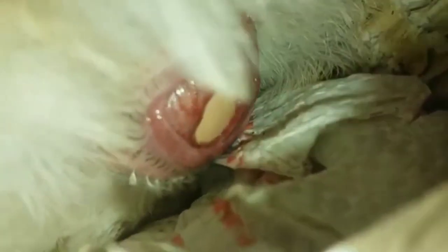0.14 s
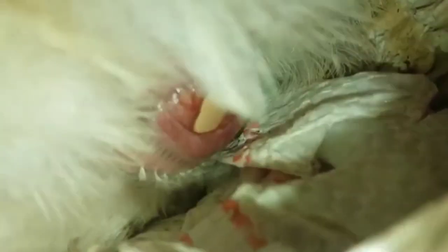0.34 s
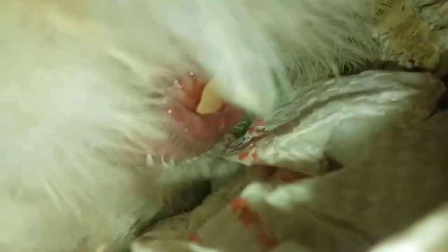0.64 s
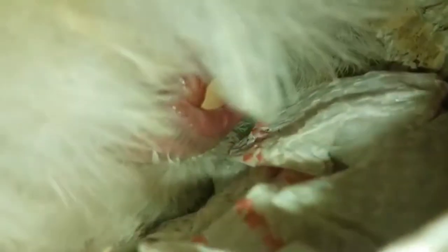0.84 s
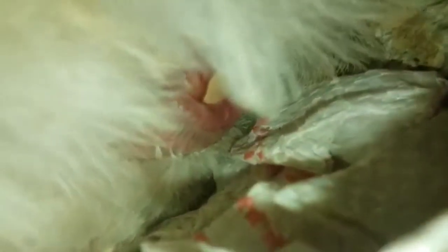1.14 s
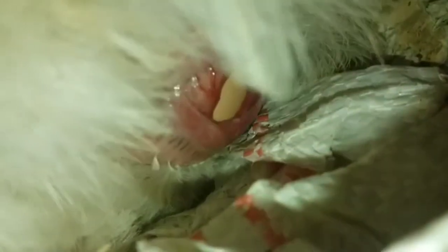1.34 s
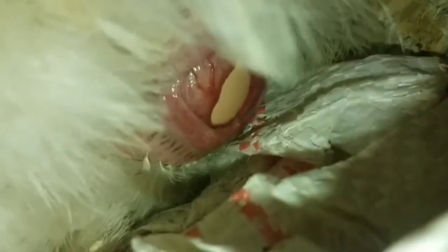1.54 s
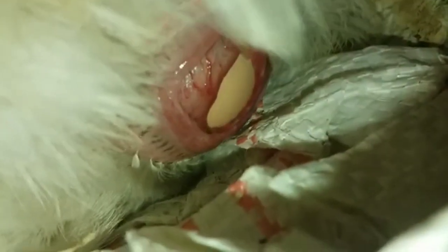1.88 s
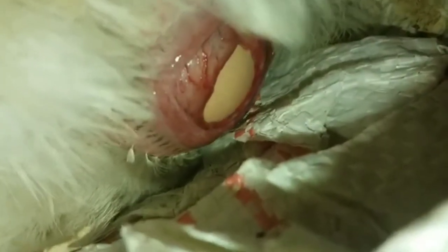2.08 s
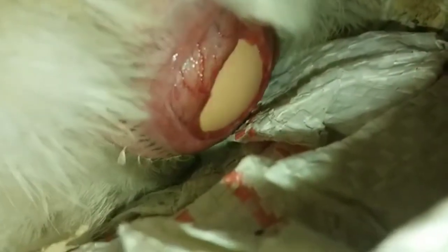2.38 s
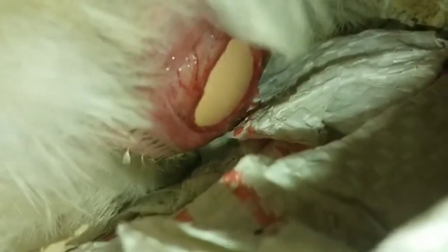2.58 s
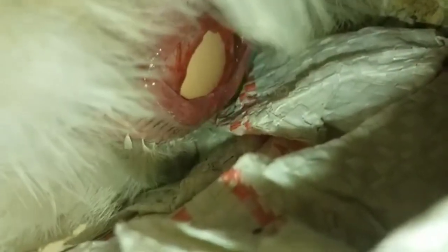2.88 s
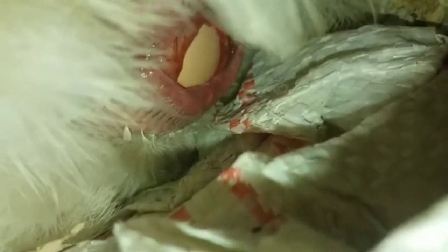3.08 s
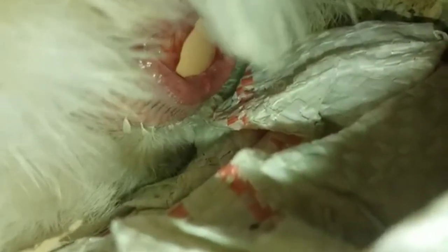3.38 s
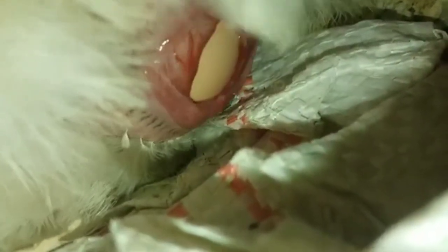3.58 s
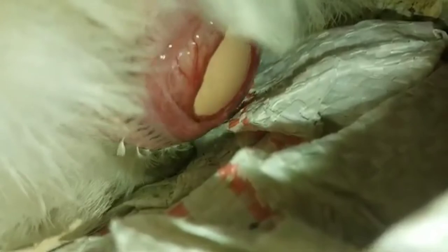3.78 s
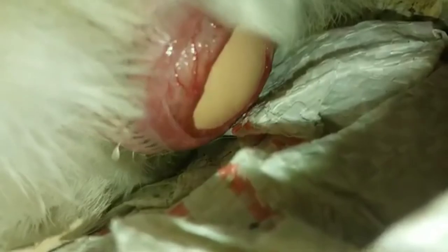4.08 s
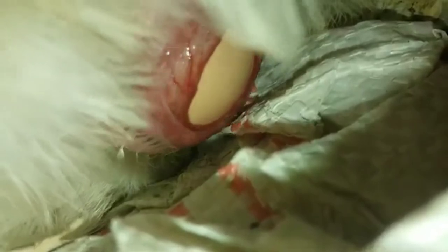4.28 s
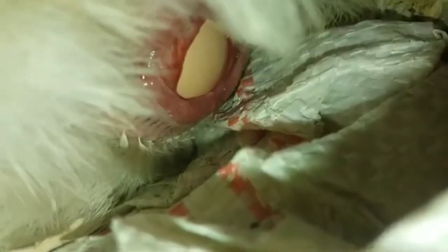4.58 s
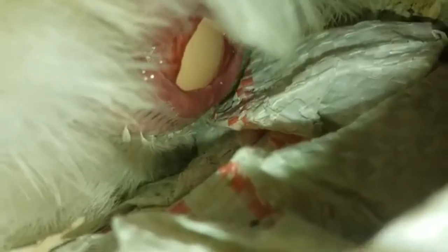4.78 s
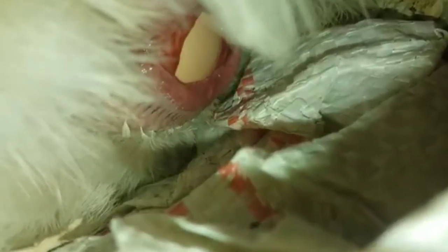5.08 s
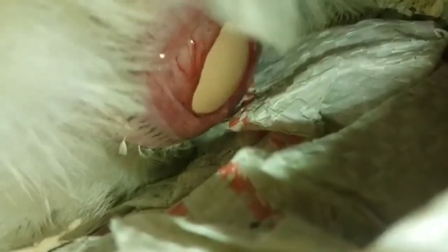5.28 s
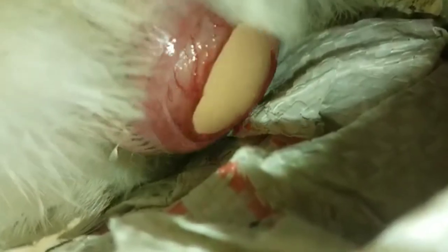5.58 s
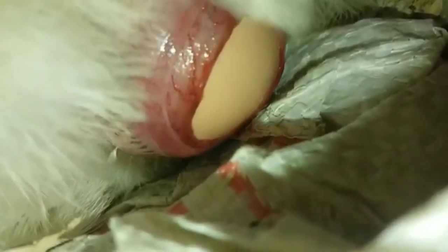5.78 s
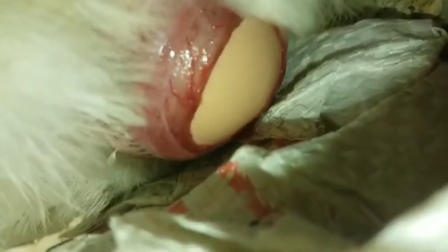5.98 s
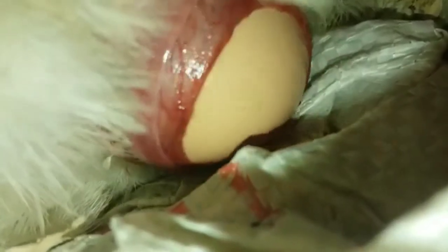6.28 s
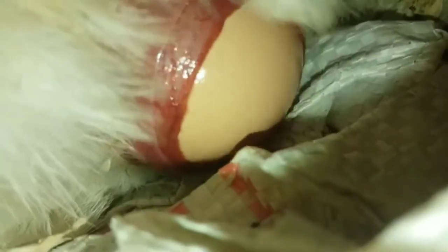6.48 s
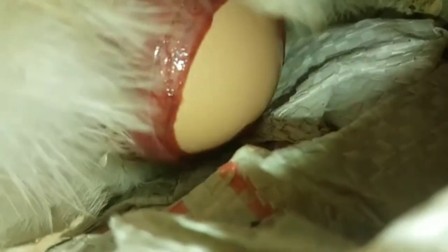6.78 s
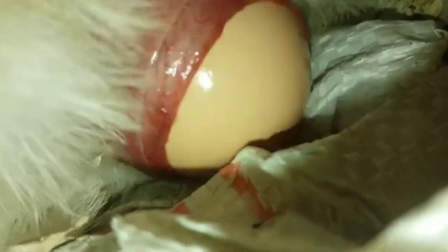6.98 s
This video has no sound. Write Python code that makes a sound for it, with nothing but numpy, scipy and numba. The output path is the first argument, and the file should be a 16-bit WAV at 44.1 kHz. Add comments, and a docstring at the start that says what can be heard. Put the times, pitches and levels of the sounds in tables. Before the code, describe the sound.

A hen is heard very close in a small boarded coop, with brief woody echoes and a faint steady rumble and hiss. From the start she gives short, hoarse, rather quiet clucks four to five times a second, while soft low thuds, dry ticks, rustling sacking and crackles bump the microphone, densest up to about 1.5 seconds. At 1.07 a loud raspy squawk of a quarter second bends upward, followed by a strong cluck at 1.4. The bumps become lighter and mostly stop after 3, leaving regular gravelly clucks. At 4.9 a second, rougher squawk bursts out, sagging at its end. Louder clucks at 5.3 and 5.55 each run into a thin, short whine. At 5.77 a long, high, wavering moan begins fairly clear, splits around 6.15 into a buzzing two-voiced rasp with faint whistling overtones, and slowly weakens until the end near 7.1.

```python
"""A hen lays an egg in a small coop, the microphone close by in the nest. She clucks hoarsely four to five times
a second and squawks twice, by uneven pulses of her syrinx through throat resonances; two thin whines among the last
clucks lead to a long moan, whose harmonics split into the sum and difference tones of a two-voiced rasp.
Soft thuds, ticks, rustle and crackles of the nest's sacking sound right at the microphone, mostly early on.
The boards of the coop echo the voice briefly, over a faint steady rumble and hiss."""
import sys
import numpy as np
from scipy import signal
from scipy.fft import rfft, irfft
from scipy.io import wavfile
from scipy.ndimage import uniform_filter1d
from numba import njit

SR = 44100
rng = np.random.default_rng(int(sys.argv[2]) if len(sys.argv) > 2 else 0)


def log_audio(samples):
    """Write samples as a 16-bit WAV file to the path given in sys.argv[1]."""
    # one column per channel
    frames = np.atleast_2d(samples).T
    # limit to full scale, then quantise
    limited = np.clip(frames, -1, 1)
    pcm = np.round(limited * 32767).astype(np.int16)
    wavfile.write(sys.argv[1], SR, pcm)


N = 314874
T = np.arange(N) / SR  # s

# pitch line of the long moan, which wavers, then tightens slowly: time_s, pitch_hz
MOAN_PITCH = [(5.765, 710.8), (5.815, 757.5), (5.86, 721), (5.92, 748.2), (5.96, 718), (6.06, 765),
              (6.2, 761.8), (6.7, 763.6), (7.14, 778.4)]
MOAN_START_S, MOAN_ATTACK_S = MOAN_PITCH[0][0], 0.025
SPLIT_AT_S = 6.15  # the second side of the syrinx is half joined in

# bumps at the microphone, before their common colouring: time_s, thud_level_db, thud_pitch_hz, tick_level_db
NEST_BUMPS = [(0.146, -7.5, 175, -46), (.301, -12.5, 243, -52), (.337, -12, 210, -40), (.487, -6, 292, -35),
              (0.501, -7.5, 200, -41), (.614, -26.5, 178, -55), (.74, -9.5, 212, -26),
              (.771, -1.5, 255, -22), (0.982, -9.5, 187, -27), (1.083, -17.5, 221, -29),
              (1.193, 0, 239, -23), (1.217, -11.5, 220, -23), (1.286, -3, 227, -22.5),
              (1.343, -11.5, 165, -29), (1.529, -8, 468, -25.5), (1.569, -18.5, 490, -32.5),
              (1.807, -12, 496, -33.5), (1.93, -34, 668, -32), (1.985, -16.5, 540, -33.5),
              (2.04, -14, 366, -23.5), (2.083, -21, 260, -31), (2.204, -19.5, 493, -48),
              (2.286, -25.5, 618, -27.5), (2.299, -24, 398, -37), (2.449, -27.5, 650, -46),
              (2.614, -19, 657, -59), (2.682, -36, 694, -29.5), (2.73, -25.5, 531, -58),
              (2.899, -29, 535, -51), (2.947, -31, 620, -57), (3.189, -52, 500, -39),
              (4.034, -36.5, 294, -40), (5.691, -24.5, 740, -60)]


def undb(db):
    """Decibels to gain."""
    return 10 ** (np.asarray(db) / 20)


def unit(x):
    """Scale to rms 1."""
    return x / np.sqrt(np.mean(x ** 2) + 1e-18)


def steady(x, size=900):
    """Scale so that the running rms over `size` samples is about 1."""
    return x / np.sqrt(np.abs(uniform_filter1d(x ** 2, size)) + 1e-12)


def curves(rows, t):
    """The columns of a table, joined by straight lines along the first."""
    s, *columns = np.transpose(rows)
    return [np.interp(t, s, c) for c in columns]


def colour(x, points, size=8192):
    """Causal minimum-phase filter through (Hz, dB) points."""
    hz, db = np.transpose(points)
    bins = np.maximum(np.fft.rfftfreq(size, 1 / SR), 1)
    cepstrum = irfft(np.log(undb(np.interp(np.log(bins), np.log(hz), db))))
    # folding the cepstrum forward in time makes the response causal
    cepstrum[1:size // 2] *= 2
    cepstrum[size // 2 + 1:] = 0
    response = irfft(np.exp(rfft(cepstrum)))
    return signal.fftconvolve(x, response)[:len(x)]


def resonance(x, hz, width_hz):
    """Two-pole band-pass, gain 1 at the centre."""
    return signal.lfilter(*signal.iirpeak(hz, hz / width_hz, fs=SR), x)


@njit
def moving_resonance(x, hz, width_hz):
    """State-variable band-pass whose centre moves, gain 1 at the centre."""
    y, band, low = np.empty(len(x)), 0., 0.
    for i in range(len(x)):
        g, k = np.tan(np.pi * hz[i] / SR), width_hz / hz[i]
        v = (band + g * (x[i] - low)) / (1 + g * (g + k))
        band, low, y[i] = 2 * v - band, low + 2 * g * v, k * v
    return y


def wander(t, rate):
    """Random values, `rate` a second, joined by lines."""
    values = rng.standard_normal(8192)
    place = (t - t[0]) * rate
    return 1.2 * np.interp(place, np.arange(len(values)), values)


def envelope(t, start, length, attack_s, release_s):
    """Rise, hold and fall, 0-1."""
    rise, fall = (t - start) / attack_s, (start + length - t) / release_s
    return np.clip(np.minimum(rise, fall), 0, 1)


def syrinx(t, hz, rough, jitter, shimmer, doubling, air_db, count=16):
    """Membrane pulses of uneven period and size, alternately strong and weak, with a puff of air in each cycle."""
    phase = 2 * np.pi * np.cumsum(hz * (1 + jitter * rough * wander(t, 450))) / SR
    # the windpipe delays each harmonic differently, which spreads a pulse over its cycle
    pulses = unit(sum(np.cos(k * phase + k * k / 2) for k in range(1, count + 1)))
    strength = 1 + rough * (shimmer * wander(t, 500) + doubling * np.cos(phase / 2))
    air = rng.standard_normal(len(t)) * (1 + .5 * np.cos(phase))
    return pulses * strength + undb(air_db) * rough * air


def clucks():
    """Each cluck is one short push: the voice snaps on low, rises, swells and droops; treble opens at its height."""
    # single clucks: centre_s, length_s, pitch_hz at the centre, level_db
    cluck_rows = [(0.173, 0.075, 345.6, -36.5), (.368, 0.053, 339, -32), (0.566, 0.052, 360.7, -32.5),
                  (0.787, 0.067, 365, -30.5), (1.007, 0.066, 342.5, -33.5), (1.413, 0.062, 337.4, -21),
                  (1.618, .059, 368, -25.5), (1.839, 0.075, 373.8, -28), (2.362, 0.069, 366, -30),
                  (2.586, 0.071, 373.2, -29), (2.813, .066, 402.6, -29), (3.021, 0.062, 386.8, -28),
                  (3.234, .067, 352.2, -30.5), (3.45, .075, 387.5, -31), (3.677, .065, 406, -28),
                  (3.912, .065, 400.2, -28), (4.153, 0.073, 368, -30.5), (4.401, 0.07, 364.3, -28.5),
                  (4.615, .055, 374.7, -27.5), (4.841, 0.072, 348, -27.5), (5.32, 0.075, 467, -23.5),
                  (5.564, .075, 396.4, -25)]
    # throat of the clucking hen: frequency_hz, level_db
    throat = [(120, -37), (205, -10), (290, -13.5), (390, -9.5), (560, -10), (780, -4), (1030, -1.5),
              (1220, -0.5), (1380, -9.5), (1580, -26), (1830, -19), (2500, -36), (2900, -35), (3500, -42),
              (6000, -66), (8000, -89.5)]
    # a tighter voice is cleaner: pitch_hz, roughness (0-1)
    roughness = [(370, 0.93), (467, 0.63)]
    # bass of the clucks, thinner in the later ones: time_s, level_db
    bass = [(2.4, -0.5), (3.4, 2), (4.4, -2), (5.3, -10)]
    climb, arch = 0.1605, .75  # shares of the pitch: climb over a cluck, and how far its ends hang down
    out = np.zeros(N)
    for centre, length, hz, db in cluck_rows:
        rough, = curves(roughness, hz)
        span = np.abs(T - centre) < .7 * length
        t = T[span]
        u = (t - centre) / length  # place in the cluck, in lengths from its centre
        push = np.exp(-np.abs(u / 0.35) ** 2.2)
        onset = np.clip((u + .52) * length / .003, 0, 1)
        pitch = hz * (1 + climb * u - arch * u ** 2 + .025 * wander(t, 50))
        source = syrinx(t, pitch, rough, jitter=.04, shimmer=.5, doubling=.9, air_db=-5)
        bass_db, = curves(bass, centre)
        voice = colour(colour(source, throat), [(210, bass_db), (350, bass_db / 2), (650, 0.0048)])
        # the throat resonance sweeps up to the third harmonic as the beak opens, and back down
        throat_hz = 3 * hz * np.maximum(1 - 1.8 * (u - .1) ** 2, .5)
        voice = voice + 0.77 * moving_resonance(voice, throat_hz, 200.0)
        closed = colour(voice, [(1300, -3), (2200, -15.0), (5000, -14.5)])
        opening = push * voice + (1 - push) * closed
        out[span] += undb(db) * onset * push * steady(opening, size=400)
    return out


def squawks():
    """Loud held cries that bend in, break up at both ends, sag as the push ends and turn brighter where rough."""
    # single squawks: start_s, length_s, pitch_hz at mid-length, glide_hz_per_s,
    # scoop (opening dip as a share of the pitch, negative is upward), level_db at mid-length, swell_db_per_s,
    # roughness (0-1) while held, beak_hz at the start, sink_s (time the beak resonance takes to sink)
    squawk_rows = [(1.065, .232, 550.1, 151.5, .18, -17, 9, 0.21, 3010, .04),
                   (4.912, 0.28, 559, -39.5, -.08, -18.5, 1.5, .5, 2620, 0.078)]
    # throat of the squawking hen: frequency_hz, level_db
    throat = [(200, -50.5), (400, -18), (530, -10.5), (770, -6), (1130, -3.5), (1400, -8.5), (1750, -20.5),
              (2250, -19), (2600, -30), (3000, -38.5), (3450, -30.5), (4100, -46.5), (4500, -43),
              (5100, -54), (6000, -50.5), (7500, -89)]
    scoop_at_s, scoop_width_s = .024, .012  # when the opening scoop is deepest
    sag = 0.24  # share of the pitch lost as the push ends
    break_s, break_rough = .035, .85  # length and roughness of the broken ends
    low_beak_hz, upper_ratio = 2218, 1.47  # where the beak resonance sinks to; a weaker one moves above it
    beak_flare = 1.5  # extra ring of the beak while it is wide open
    out = np.zeros(N)
    for start, length, hz, glide, scoop, db, swell, held_rough, open_hz, sink_s in squawk_rows:
        span = (T > start) & (T < start + length)
        t = T[span]
        age, left = t - start, start + length - t
        dip = scoop * np.exp(-((age - scoop_at_s) / scoop_width_s) ** 2)
        dip = dip + sag * np.exp(-(left / break_s) ** 2)
        pitch = (hz + glide * (age - length / 2)) * (1 - dip)
        broken = np.exp(-(np.minimum(age, left) / break_s) ** 4)
        rough = held_rough + (break_rough - held_rough) * broken
        gape = np.exp(-(age / sink_s) ** 2)
        beak_hz = low_beak_hz + (open_hz - low_beak_hz) * gape
        source = syrinx(t, pitch, rough, jitter=.05, shimmer=.7, doubling=.6, air_db=5)
        # turbulent air buries the upper harmonics in rasp
        source = source + 1.3 * resonance(rng.standard_normal(len(t)), 4000, 2600)
        voice = colour(source, throat)
        beak = moving_resonance(moving_resonance(voice, beak_hz, 430.0), beak_hz, 430.0)
        upper_hz = upper_ratio * beak_hz
        upper = moving_resonance(moving_resonance(voice, upper_hz, 350.0), upper_hz, 350.0)
        ring = rough * (1 + beak_flare * gape) * (2.1 * beak + 1.3 * upper)
        voice = voice + 0.87 * resonance(voice, 1120, 140) + ring
        gain = undb(db + swell * (age - length / 2) - 1.5 * broken)
        gain = gain * envelope(t, start, length, attack_s=0.02, release_s=0.06)
        out[span] += gain * steady(voice)
    return out


def two_voices(t, hz, share):
    """A thin held note; as the second side of the syrinx joins in, sum and difference tones turn it into a rasp."""
    # harmonics of the thin note: multiple, level_db
    harmonics = [(1, -3.5), (2, 3.5), (3, -32.5), (4, -36)]
    # faint top harmonics that come and go: multiple, level_db
    sheen = [(5, -50.5), (7, -51), (8, -52)]
    # tones of the two coupled voices: multiple of the first, multiple of the second, level_db
    combinations = [(0, 1, -0.5), (1, 1, 0.5), (1, 2, -13.5), (0, 2, -11.5), (2, -1, -13.5)]
    # throat that colours the rasping air: frequency_hz, level_db
    throat = [(180, -59.5), (420, -25.5), (570, -7.5), (680, -8), (800, -11.5), (1180, -10), (1340, -4),
              (1520, -13), (1680, -22.5), (1880, -13), (2100, -32.5), (2720, -35.5), (2950, -49.5),
              (7000, -75)]
    second_hz = 571
    # the second voice keeps catching and letting go
    share = np.clip(share + .1 * wander(t, 22), 0, 1)
    rough = 0.15 + .7 * share  # the first voice by itself is slightly rough
    first = 2 * np.pi * np.cumsum(hz * (1 + 0.0487 * rough * wander(t, 350))) / SR
    second = 2 * np.pi * np.cumsum(second_hz * (1 + .017 * wander(t, 300))) / SR
    clear = sum(undb(d) * np.sin(round(k) * first) for k, d in harmonics)
    clear = clear + sum(undb(d) * wander(t, 65) * np.sin(round(k) * first) for k, d in sheen)
    # each combination tone flares and fades by itself
    split = sum(undb(d + 3.8 * wander(t, 44.86)) * np.sin(round(k) * first + round(m) * second)
                for k, m, d in combinations)
    # air escapes in puffs at the beat between the two sides
    puffs = rng.standard_normal(len(t)) * (1 + np.cos(first - second))
    rasp = unit(colour(puffs, throat))
    voice = (1 - 0.74 * share) * clear + share * split
    voice = voice * (1 + 0.35 * rough * wander(t, 400))
    return steady(steady(voice, size=4000) + rough * rasp, size=1800)


def moan():
    """One long note that starts fairly clear, splits into two voices and fades slowly."""
    level_db, fade_db_per_s = -27.5, 5
    share_before, share_after = 0.25, 0.854  # mean share of the second voice, 0-1
    span = T > MOAN_START_S
    t = T[span]
    age = t - MOAN_START_S
    hz, = curves(MOAN_PITCH, t)
    split = (1 + np.tanh((t - SPLIT_AT_S) / 0.037)) / 2
    gain = undb(level_db - fade_db_per_s * age) * np.minimum(age / MOAN_ATTACK_S, 1)
    out = np.zeros(N)
    out[span] = gain * two_voices(t, hz, share_before + (share_after - share_before) * split)
    return out


def overtone():
    """Thin, slightly grainy whistles ride on the moan, flare where the voice splits and sink in pitch."""
    # whistles above the moan: pitch_hz before sinking, level_db before the flare, fade_db_per_s after the split
    whistles = [(2850, -60, 0), (4780, -77.5, 17.5)]
    sink_hz, sink_s = 160, .22
    flare_db, flare_s = 10.5, 0.07
    since = T - SPLIT_AT_S
    # the pitch begins to sink as the flare builds up
    sunk_hz = sink_hz * (1 - np.exp(-np.maximum(since + flare_s, 0) / sink_s))
    attack = np.clip((T - MOAN_START_S) / MOAN_ATTACK_S, 0, 1)
    gain = undb(flare_db * np.exp(-(since / flare_s) ** 2)) * attack
    out = np.zeros(N)
    for hz, db, fade in whistles:
        phase = 2 * np.pi * np.cumsum((hz - sunk_hz) * (1 + .01 * wander(T, 400))) / SR
        grain = 1 + 0.5 * wander(T, 90)
        out += undb(db - fade * np.maximum(since, 0)) * np.sin(phase) * grain
    return gain * out


def whines():
    """Short notes: the pitch arches over a clear crest, the voice frays off it and the level fades."""
    # single whines: start_s, length_s, crest_s, crest_pitch_hz, arch_width_s, level_db at the crest,
    # fade_db_per_s, share of the second voice at the crest (0-1)
    whine_rows = [(5.282, 0.21, 5.365, 721, .095, -32.5, 40.5, 0.25),
                  (5.572, 0.17, 5.622, 766.7, .04, -26.5, 69.5, 0)]
    arch = 0.11  # share by which the pitch lies lower off the crest
    fray = .3  # how much the share of the second voice grows off the crest
    out = np.zeros(N)
    for start, length, crest, hz, width, db, fade, share in whine_rows:
        span = (T > start) & (T < start + length)
        t = T[span]
        slack = 1 - np.exp(-((t - crest) / width) ** 2)
        gain = undb(db - fade * (t - crest)) * envelope(t, start, length, attack_s=0.014, release_s=0.032)
        out[span] += gain * two_voices(t, hz * (1 - arch * slack), share + fray * slack)
    return out


def coop(x, early_db, early_s, tail_db, t60, size=26000):
    """Near boards scatter the first echoes; a short tail follows."""
    # what the boards give back: frequency_hz, level_db
    boards = [(100, -7.5), (400, -2), (800, -2.5), (1130, -2), (1600, -1.5), (3000, -2.5), (8000, -14.5)]
    t = np.arange(size) / SR
    early, tail = (colour(rng.standard_normal(size), boards) for _ in range(2))
    early = unit(early * np.exp(-t / early_s) * (t > .002))
    tail = unit(tail * undb(-60 * t / t60) * (t > .012))
    response = (t == 0) + (undb(early_db) * early + undb(tail_db) * tail) / np.sqrt(size)
    # the boards are irregular and favour no pitch: narrow humps and dips are evened out
    power = np.abs(rfft(response)) ** 2
    even_db = 10 * np.log10(uniform_filter1d(power, size=600) / uniform_filter1d(power, size=30))
    response = colour(response, np.column_stack([np.fft.rfftfreq(size, 1 / SR), even_db])[1:])
    return signal.fftconvolve(x, response)[:N]


def bumps(size=6000):
    """A bump is a heavily damped thud, a lower and longer wobble of the body, and a dry tick on contact."""
    shake_colour = [(40, -29.5), (80, 1.0), (400, -2.5), (800, -9), (2500, -42.5)]
    tick_colour = [(300, -17), (1200, 6.0), (2500, -3.5), (4500, -9.5), (7000, -21.0), (14000, -12.0)]
    out, t = np.zeros(N + size), np.arange(size) / SR
    for s, db, hz, tick_db in NEST_BUMPS:
        # the lower the thud, the more the body wobbles: -5 dB against a 207 Hz thud, 8 dB less per octave up
        body_db = -5 - 8 * np.log2(hz / 207)
        thud = -np.sin(2 * np.pi * hz * t) * np.exp(-t * hz / 0.57)
        body_hz = 110 * (1 + 0.092 * rng.standard_normal())
        body = np.sin(2 * np.pi * body_hz * t) * np.exp(-t / 0.0036)
        shake = unit(colour(rng.standard_normal(size), shake_colour)) * np.exp(-t / 0.011)
        tick = unit(colour(rng.standard_normal(size), tick_colour)) * np.exp(-t / 0.0019)
        sound = undb(db) * (thud + undb(body_db) * (body + 0.3 * shake)) + undb(tick_db) * tick
        start = int(s * SR)
        out[start:start + size] += sound
    return colour(out[:N], [(30, -22.0), (70, -5.5), (900, 3.5), (2500, -1.5), (8000, -17.5)])


def nest():
    """Shifting feathers and sacking: a low rumble that swells around every bump, and sparse crackles."""
    # the nest settles: time_s, level_db of its rustle
    settling = [(0, -46), (2.1, -52), (2.6, -63), (4.5, -69.5)]
    rumble_colour = [(38, -30.5), (70, 4.5), (220, -2.5), (500, -8), (1200, -18), (4000, -33.5), (7000, -56.5)]
    crackle_colour = [(200, -3.5), (600, 12.5), (2000, 5), (4000, -4.0), (7000, -28.5), (14000, -12)]
    swell_db, swell_s = -38, 0.042  # rustle before and after a bump, against its thud; how fast it dies away
    db, = curves(settling, T)
    swells = sum(undb(thud_db + swell_db) * np.exp(-np.abs(T - s) / swell_s) for s, thud_db, _, _ in NEST_BUMPS)
    stir = undb(db) + swells
    rumble = unit(colour(rng.standard_normal(N), rumble_colour))
    # about 120 grains a second, most of them faint
    grain_gain = undb(np.minimum(8 * rng.exponential(size=N), 24))
    grains = (rng.random(N) < 120 / SR) * rng.choice([-1, 1], N) * grain_gain
    crackle = unit(colour(grains, crackle_colour))
    flutter = undb(3.5 * wander(T, 25) - 2.5)
    return stir * flutter * rumble + undb(db - 7.5) * crackle


def background():
    """A faint steady rumble and hiss: noise through a fixed colour."""
    # colour of the floor: frequency_hz, level_db
    floor_colour = [(25, -37), (45, -21), (68, 3), (110, -6.5), (200, -9.5), (550, -17), (1200, -27.5),
                    (2500, -29.5), (8000, -44.5), (15000, -35.5)]
    return undb(-58) * unit(colour(rng.standard_normal(N), floor_colour))


def scene():
    """The hen in the coop, the nest at the microphone, the faint floor beneath."""
    hen = clucks() + squawks() + whines() + moan() + overtone()
    hen_in_coop = coop(hen, early_db=-8.5, early_s=0.013, tail_db=-18.5, t60=0.3)
    return (hen_in_coop + bumps() + nest() + background())[None]


def record(dry):
    """The recorder cuts the top, steeply above 15.2 kHz."""
    low_pass = signal.ellip(10, .2, 70, 15200, fs=SR, output="sos")
    return signal.sosfilt(low_pass, dry)


dry = scene()
out = record(dry)
log_audio(out)
```